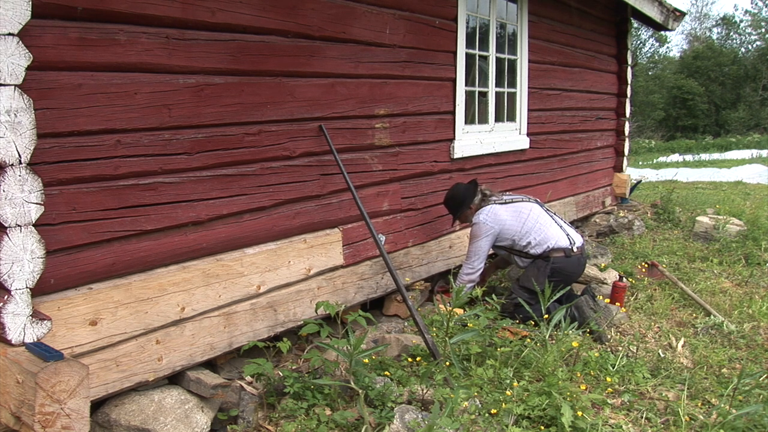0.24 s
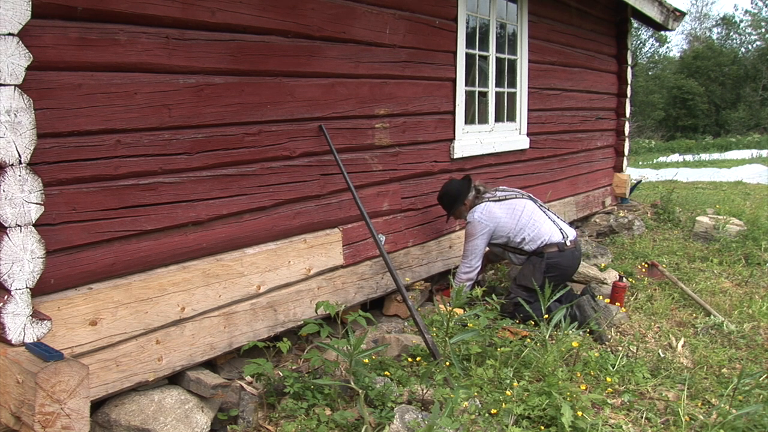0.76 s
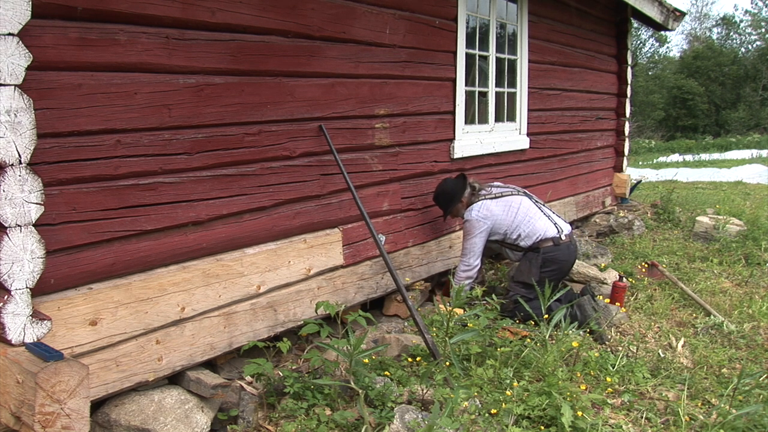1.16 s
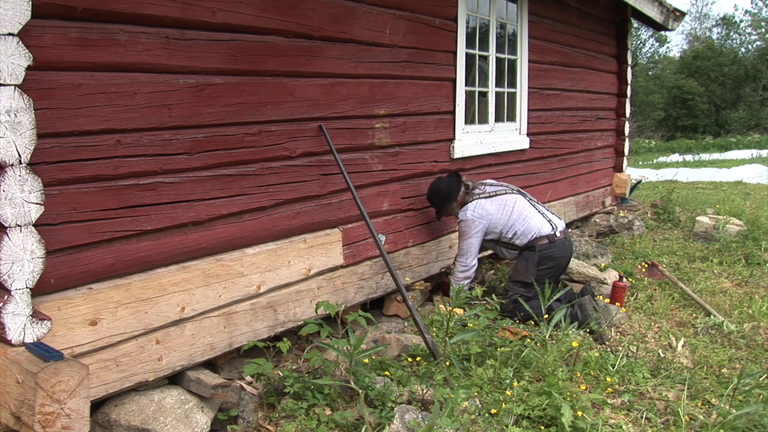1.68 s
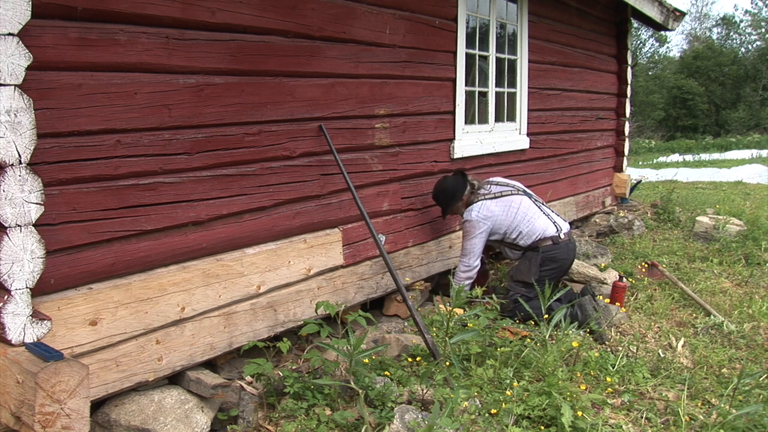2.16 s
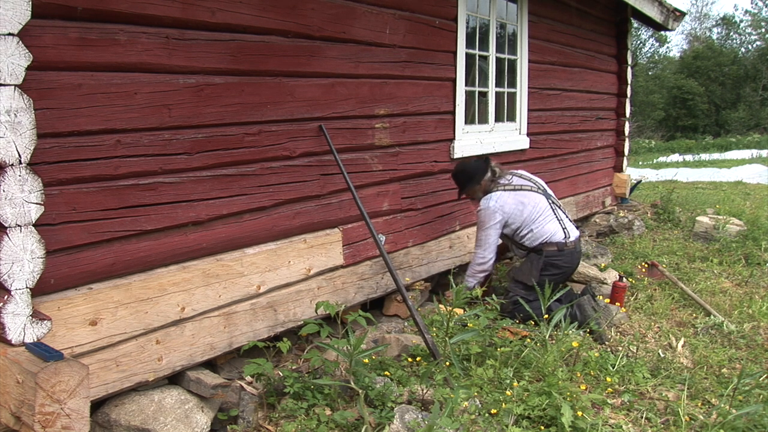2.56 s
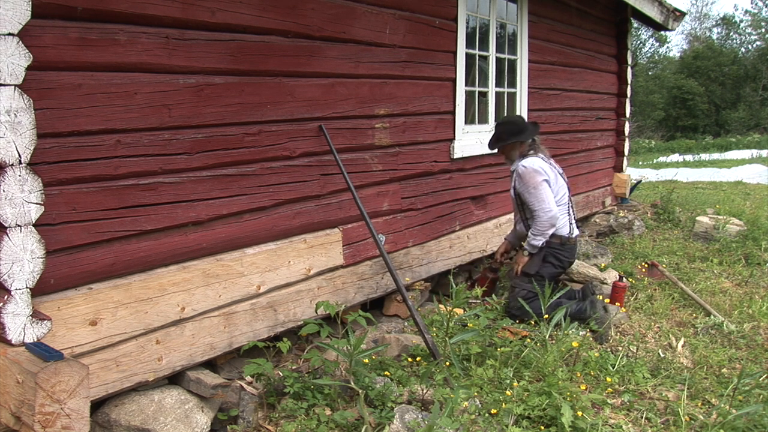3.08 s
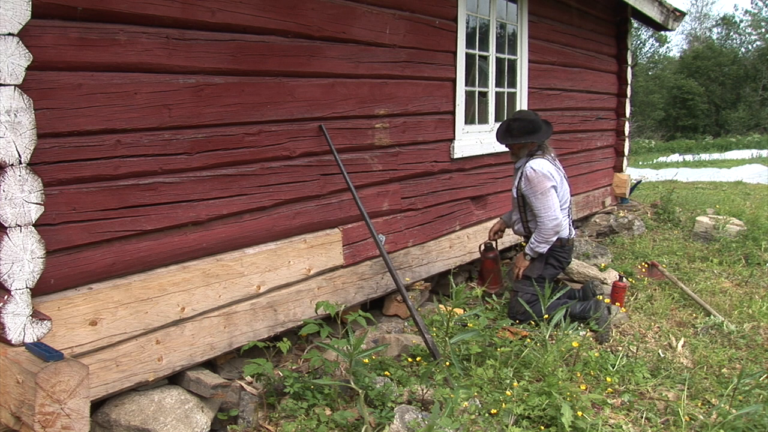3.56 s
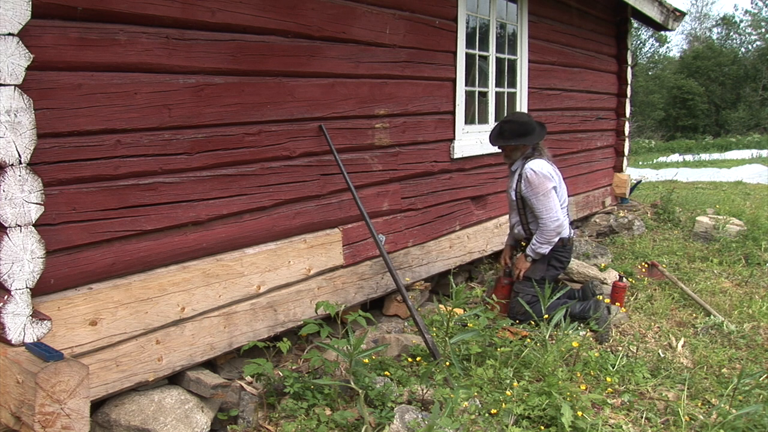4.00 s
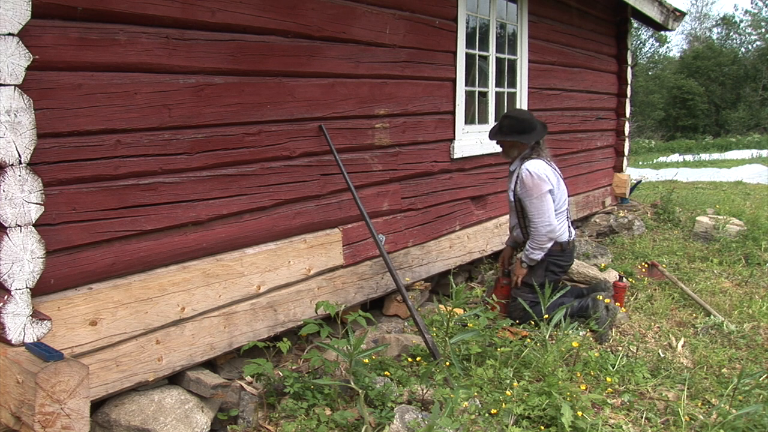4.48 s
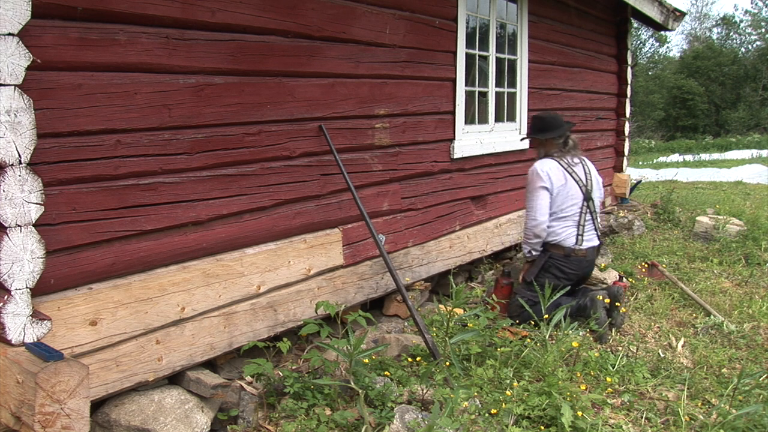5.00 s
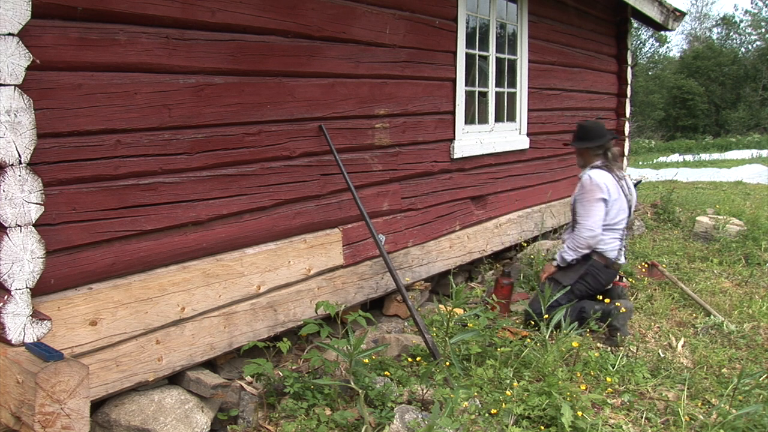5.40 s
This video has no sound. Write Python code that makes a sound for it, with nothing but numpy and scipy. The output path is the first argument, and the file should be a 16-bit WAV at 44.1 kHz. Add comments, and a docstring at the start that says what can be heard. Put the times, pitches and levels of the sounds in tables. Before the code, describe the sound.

Beside a log wall, a kneeling worker shifts stones and a steel jack. Three short clusters of metallic clinks with gritty stone clacks come over low wooden bumps, separated by quieter ticks and thuds. The jack is then set down on soft ground with a muted thump and two small ticks. Cloth and grass rustle gently over a steady, quiet air bed. Stereo microphones, little reverberation.

```python
"""Beside a log house, someone kneels and shifts loose stones and a steel jack under the sill.
The steel clinks on the stones in three flurries: decaying, beating modes over gritty, resonant stone clacks.
Filtered noise bursts tick like small stones; low decaying modes bump and thump on timber and ground.
Clothes and grass rustle as swelling noise, over a steady noise bed of open air and far trees."""
import sys
import numpy as np
from scipy import signal
from scipy.io import wavfile

SR = 44100
rng = np.random.default_rng(int(sys.argv[2]) if len(sys.argv) > 2 else 0)


def persist_wave(psi):
    """Save psi, clipped to +-1, as 16-bit WAV."""
    counts = np.round(np.clip(psi, -1, 1) * 32767).astype(np.int16)
    wavfile.write(sys.argv[1], SR, np.atleast_2d(counts).T)


N = 249165  # length in samples

# The steel's main modes, named for their sound [Hz]
HUM, CLANK, CLINK, RING, CHINK, TANG, TING, ZING, PING, SHIMMER = 1212, 2382, 2856, 3198, 3628, 3818, 4460, 5250, 5920, 11380
# The main modes of the sill, and of the struck stones [Hz]
BOOM, THUD, TOCK, CLACK = 110.6, 221.4, 751, 1742

# Steel on stone: (time [s], relative clack level [dB], contact length [s], relative ring level [dB],
#   ring length [share of the free ring], brightness [dB per octave],
#   modes the struck spot favours or mutes [(frequency [Hz], change [dB])])
KNOCKS = [(0.0272, -22, 0.031, -28.5, 1.9, 3, [(5400, 13.7), (TANG, 14.5), (CLACK, 9.1)]),
          (0.0345, -27, 0.013, -27.5, 1.24, -3, [(CLANK, 5.8), (CLINK, 1), (RING, 3.1), (CLACK, 12),
          (PING, 4.2)]), (0.086, -37.5, 0.092, -36.5, 0.78, 2, [(CLANK, 9.2), (3440, 19), (PING, 1.7)]),
          (0.211, -38.5, 0.07, -45, 0.76, -2, [(3400, 17), (5124, 4.6), (CLANK, -6)]),
          (0.2653, -25.5, 0.047, -35.5, .57, 5.5, [(TING, 20), (RING, 4.7)]),
          (0.275, -36.5, 0.068, -38, 0.47, 5, [(TING, 28.4)]),
          (0.3398, -23, 0.031, -32.5, .35, 1, [(CLANK, 5.2), (4300, 7.6), (TING, 14), (ZING, -8)]),
          (0.364, -36, 0.065, -41, 0.83, 0, [(CLANK, 1), (RING, 2.2)]),
          (2.0313, -39.5, 0.047, -40, 0.37, -4.5, [(CLANK, -8), (CLINK, 6.5), (ZING, 11), (PING, -11),
          (SHIMMER, 13)]), (2.065, -34, 0.033, -42, 0.6, 5.5, [(CLANK, 16), (CHINK, 5.5), (TANG, 12.4),
          (ZING, 2.7)]), (2.122, -29, 0.013, -35.5, .98, -4.5, [(CLANK, 6.2), (CLINK, -3)]),
          (2.137, -53, .02, -38.5, 0.71, 0.5, [(CLANK, 11), (CLINK, 6.7), (CHINK, -12), (PING, 6.3)]),
          (2.1729, -34, 0.017, -39, .32, 7.5, [(PING, 13), (RING, 4.3), (CLANK, -10), (SHIMMER, 7.1)]),
          (2.1848, -28, 0.017, -46.5, 0.68, 8, [(RING, 15), (PING, 20), (CLINK, 3.6), (HUM, 22.7)]),
          (2.238, -35, 0.06, -49, 0.43, 10, [(PING, 11), (ZING, -12), (CHINK, 6.7)]),
          (2.2814, -31.5, 0.016, -36, 0.77, 2.5, [(ZING, 8.7), (PING, 12), (CHINK, -21), (SHIMMER, 10),
          (12730, 15)]), (3.281, -24.5, 0.015, -37, 0.41, -1.5, [(CLANK, 8.4), (CHINK, 2.7), (TANG, 7.9),
          (4629, 11), (6500, 11), (11400, 14.7)]), (3.351, -39, 0.027, -38.5, 0.13, -4, [(RING, 11),
          (CHINK, 6), (TANG, 12)]), (3.364, -52, .02, -44, .3, -2.5, [(TANG, 20), (CHINK, 8.2),
          (PING, 12.4)]), (3.4345, -26, 0.024, -41, 0.87, 0, [(CLINK, 7), (RING, 6.3), (ZING, 3.5),
          (SHIMMER, 13)]), (3.446, -50, .012, -48, 1.5, -7, [(CLINK, 20.6), (RING, 6.5), (ZING, 6.1),
          (SHIMMER, 14)]), (3.462, -63, 0.022, -52.5, 0.44, 2, [(CLINK, 19.3), (ZING, 7.1), (SHIMMER, 15)]),
          (3.496, -62, 0.042, -54.5, 1.6, -13, [(RING, 11), (CLANK, 5.3)]),
          (3.613, -73, 0.069, -54, 1, -17, [(CLANK, 9.7)]),
          (3.66, -58, 0.057, -53.5, 1.2, 0.5, [(ZING, 9.6), (PING, 7.9), (HUM, 14), (CHINK, -19)])]
# Modes of the steel: (frequency [Hz], relative level [dB], free t60 [s])
STEEL_MODES = [(HUM, -11, .24), (CLANK, 1.5, .17), (CLINK, 4.8, .2), (RING, -.4, .4), (CHINK, -1, .1),
               (TANG, -9.5, .39), (3950, -10, .1), (TING, -23, .14), (4629, -23, .3), (5124, -14, .14),
               (ZING, -4, .19), (PING, -7.5, .39), (6075, -23, .3), (6390, -18, .14), (7260, -23, .22),
               (8120, -17, .24), (9162, -21, .42), (10200, -31, .15), (SHIMMER, -31, .24),
               (12730, -34, .24)]
# How the ring reaches two microphones: (frequency [Hz], left minus right [dB], left lead [rad])
EARS = [(1200, -4, .4), (2300, 0, .08), (3900, .3, 0), (4457, 8, -.4), (5200, -4, -.3), (5950, 5, -2.7),
        (8100, -3, -3.1), (9200, -2, -2.1), (11400, 3, 0), (12700, -1, .9)]
# Colour of the steel's faint overtones: (frequency [Hz], relative level [dB])
OVERTONE_COLOUR = [(3300, -3), (4800, 0), (6400, 1), (7400, -29), (8600, -2), (12000, -17), (15000, -9)]
# Resonances of the struck stones: (frequency [Hz], width [Hz], relative level [dB])
STONE_MODES = [(1084, 72, 0.5), (CLACK, 60, 7), (1880, 80, 2), (1983, 60, 5), (2170, 110, -7),
               (2710, 49, 0.5), (2870, 54, 5), (3168, 120, 0.77), (3410, 115, -0.53), (3526, 29, -2.3),
               (3970, 150, -10), (4466, 50, -27.5), (5070, 98, -7.5), (5200, 260, -9), (5600, 127, -20.5),
               (7640, 300, -43), (11300, 2100, -43.5)]
# Small stones ticking: (time [s], relative level [dB], brightness [dB per octave])
TICKS = [(0.151, -26.5, -2.5), (0.9916, -29.5, -1), (1.4023, -53, 7), (1.908, -35, -3.5),
         (2.2372, -20, -2.5), (2.633, -33, -6.5), (3.249, -38.5, -4), (3.4325, -29, -5.5), (4.06, -40, 1.5),
         (4.081, -35.5, -1), (4.272, -43.5, -3.5)]
# Colour of a tick: (low edge [Hz], high edge [Hz], relative level [dB])
TICK_BANDS = [(1670, 3250, -4), (3320, 5070, -7), (9000, 14000, -17.5)]
# Reflections off the log wall and the ground: (delay [s], level against the direct sound [dB])
ECHOES = [(.0031, -14), (.0074, -24.5), (0.013, -17)]
# Stones bumping on earth and timber: (time [s], relative level [dB], hardness [dB per octave],
#   modes the spot favours or mutes [(frequency [Hz], change [dB])])
BUMPS = [(0.002, -37.5, -6.5, []), (0.034, -37, -3.5, []), (0.103, -42.5, -3, [(THUD, 7.7)]),
         (0.151, -31, 0, [(TOCK, 9.2)]), (0.158, -42, -3, [(TOCK, 16), (BOOM, 8.5)]),
         (0.208, -39, -5.5, []), (0.305, -38, 0, []), (0.802, -46.5, 6, []), (1.077, -48, -3, []),
         (1.124, -39.5, -2.5, [(THUD, 7)]), (1.333, -43, -7.5, [(THUD, 4.2)]), (1.36, -45.5, -1, []),
         (1.392, -45.5, -3, []), (1.67, -45, 0, [(THUD, 4.3)]), (1.781, -46, -8, []),
         (1.906, -43, 1, [(BOOM, 8.3), (TOCK, 4)]), (1.961, -44, -4.5, []), (2.054, -43, 4, [(622, 7)]),
         (2.074, -40.5, -1, [(THUD, 3.5)]), (2.2375, -36, 4.5, [(492, 10.6), (TOCK, 0)]),
         (2.575, -46.5, 3.5, []), (2.616, -54, -2, [(BOOM, 13)])]
# Modes of the sill and the ground: (frequency [Hz], relative level [dB], t60 [s])
SILL_MODES = [(83, 2.4, 0.38), (BOOM, 4.3, 0.36), (152, -12, 0.64), (176.3, -6, 0.33), (THUD, 1.34, 0.074),
              (294, -1.1, 0.055), (396, -3, 0.059), (492, -7, 0.046), (622, 2.5, 0.05), (TOCK, 2.8, 0.07),
              (966, 11, 0.042)]
# Stereo place of the sill's modes: (frequency [Hz], left minus right [dB])
SILL_PAN = [(110, 5), (700, -14.5)]
# Rustle with each move of the body: (time of its height [s], level [dB], time constant of its fall [s])
MOVES = [(0.02, -49, 0.1), (2.051, -57.5, 1), (3.25, -53, 0.21), (4.082, -57, 0.1), (4.47, -58, 0.21),
         (5.33, -54.5, 0.15)]
# Colour of the rustle: (frequency [Hz], relative density [dB per Hz])
RUSTLE_COLOUR = [(200, -9), (500, 4.5), (850, 4), (2700, -1), (4500, -7.5), (8000, -27.5), (12000, -19.5),
                 (16000, -25)]
# Colour of the air and far trees: (frequency [Hz], relative density [dB per Hz])
AIR_COLOUR = [(25, -20.5), (45, -13.5), (70, -5), (100, 0.5), (150, -6), (210, -14), (330, -21.5),
              (550, -26.5), (1100, -12.5), (1800, -17.5), (2800, -19.5), (4000, -53.5), (7000, -47),
              (15700, -48)]
# Stereo likeness of the noise beds: (frequency [Hz], left-right likeness [0 to 1])
LIKENESS = [(100, 0.89), (400, 0.36), (1000, 0.29), (2400, 0.98), (6000, 0.011)]

STEEL_PIVOT_HZ, SPOT_OCTAVES = 2830, 0.06  # brightness turns about this pitch; reach of a spot's accent
DETUNE = 0.0009  # random pitch shift of a steel mode, as a share
OVERTONE_T60_S = 0.12  # before the ring length scales it
# Longer contacts than this bring out the stone's low resonances
CONTACT_S, BODY_DB_PER_DOUBLING, BODY_BELOW_HZ = 0.045, 4.5, 2200
BUMP_CENTRE_HZ, BUMP_ARCH_DB = 270, 6  # centre of a bump's colour; its loss one octave to either side
SET_DOWN_S, SET_DOWN_DB = 4.064, -39  # the jack meets the soft ground
MOVE_RISE_S, RESTING_DB = 0.093, -61.5  # time constant of a move's swell; rustle between moves
AIR_DB = -53
CUTOFF_HZ = 15700


def steel(ring_db=3.5, snap=0.51, snap_s=0.00035, build_s=0.015, choke_s=0.0052,
          spread_db=0.35, twin_db=-11, beat_hz=26, settle_s=0.66):
    """Each contact chokes the last ring and starts new decaying modes, whose length and pitch vary."""
    out, t = np.zeros((2, N)), np.arange(SR // 2) / SR
    next_times = [row[0] for row in KNOCKS[1:]] + [N / SR]
    ear_hz, ear_db, ear_lead = np.transpose(EARS)
    sides = np.array([[.5], [-.5]])
    for (s, _, _, strength_db, length, bright_db, accents), next_s in zip(KNOCKS, next_times):
        # part of the ring comes almost at once, the rest builds up while the contact chatters
        attack = 1 - snap * np.exp(-t / snap_s) - (1 - snap) * np.exp(-t / build_s)
        choke = np.exp(-np.maximum(t - (next_s - s), 0) / choke_s)
        # as the steel settles onto its support, the ring dies ever faster
        gate = attack * choke * np.exp(-(t / settle_s) ** 4)
        for hz, mode_db, t60 in STEEL_MODES:
            colour_db = bright_db * np.log2(hz / STEEL_PIVOT_HZ) + accent(hz, accents)
            # the higher the mode, the more its share is left to chance
            chance_db = spread_db * np.sqrt(hz / STEEL_PIVOT_HZ) * rng.normal()
            level_db = ring_db + strength_db + mode_db + colour_db + chance_db
            fade = from_db(level_db - 60 * t / (t60 * length))
            mode_hz = hz * (1 + DETUNE * rng.normal())
            tone = np.exp(2j * np.pi * (mode_hz * t + rng.random()))
            # the round body splits each mode into a close pair that beats
            split_hz = beat_hz * rng.uniform(0.65, 2.26)
            twin = 1 + from_db(twin_db) * np.exp(2j * np.pi * (split_hz * t + rng.random()))
            ear_gain = from_db(np.interp(hz, ear_hz, ear_db) * sides)
            ear_phase = np.exp(1j * np.interp(hz, ear_hz, ear_lead) * sides)
            add(out, s, (ear_gain * ear_phase * (gate * fade * tone * twin)).real)
    return out


def splash(splash_db=-25, low_hz=3300, high_hz=15000, scatter=0.047, spread_db=4, count=36):
    """Each knock stirs a crowd of faint, short overtones, different from knock to knock and ear to ear."""
    out, t = np.zeros((2, N)), np.arange(SR // 5) / SR
    for s, _, _, strength_db, length, bright_db, _ in KNOCKS:
        hz = np.geomspace(low_hz, high_hz, count)[:, None]
        hz = hz * (1 + scatter * rng.uniform(-1.15, 1, (count, 1)))
        colour_db = at_hz(OVERTONE_COLOUR, hz) + bright_db * np.log2(hz / STEEL_PIVOT_HZ)
        level_db = splash_db + strength_db + colour_db + spread_db * rng.normal(size=(count, 1))
        # a random phase for each overtone at each ear
        ears = np.exp(2j * np.pi * rng.random((2, count))) * from_db(level_db).T
        swing = 2 * np.pi * hz * t
        crowd = ears.real @ np.sin(swing) + ears.imag @ np.cos(swing)
        add(out, s, crowd * from_db(-60 * t / (OVERTONE_T60_S * np.sqrt(length))))
    return out


def clacks(clack_db=15, grind_db=-15, grind_lasts=6, grit_db=2.5, rise_share=0.12,
           stone_shift=0.01, crack_db=-4, crack_t60=0.0035):
    """A gritty crack and a short grind excite the stone's brief resonances, shifted at each knock."""
    out, t = np.zeros((2, N)), np.arange(SR // 3) / SR
    for s, level_db, contact_s, *_, accents in KNOCKS:
        age = t / contact_s
        press = from_db(-60 * age) + from_db(grind_db - 60 * age / grind_lasts)
        force = (1 - np.exp(-age / rise_share)) * press
        force = force + from_db(crack_db - 60 * t / crack_t60)
        # slow noise, a new point every 70 samples, roughens the force
        grit = np.interp(np.arange(len(t)) / 70, np.arange(len(t)), rng.standard_normal(len(t)))
        gritty_gain = from_db(clack_db + level_db + grit_db * np.minimum(grit, 1))
        contact = gritty_gain * force * stereo_noise(len(t), alike=0.97)
        body_db = BODY_DB_PER_DOUBLING * np.log2(contact_s / CONTACT_S)
        for k, (hz, width, db) in enumerate(STONE_MODES):
            # neighbouring modes swing in opposite senses
            gain = (-1) ** k * from_db(db + accent(hz, accents) + body_db * (hz < BODY_BELOW_HZ))
            add(out, s, gain * resonate(contact, hz * (1 + stone_shift * rng.normal()), width))
    return out


def ticks(tick_db=-10, tick_t60=0.055, alike=0.85, ring_hz=3620, ring_width_hz=110, ring_db=6):
    """Small stones give a short crack of banded noise with one brief resonance."""
    out, t = np.zeros((2, N)), np.arange(SR // 6) / SR
    for s, strength_db, bright_db in TICKS:
        for low, high, band_db in TICK_BANDS:
            tilt_db = bright_db * np.log2(low / TICK_BANDS[0][0])
            burst = stereo_noise(len(t), alike) * from_db(-60 * t / tick_t60)
            # make up for the power lost outside the band
            crack = band(burst, low, high) * np.sqrt(SR / 2 / (high - low))
            crack = crack + from_db(ring_db) * resonate(crack, ring_hz, ring_width_hz)
            add(out, s, crack * from_db(tick_db + strength_db + band_db + tilt_db))
    return out


def wall(x):
    """Close reflections, delayed and weaker copies, thicken every crack."""
    out = x.copy()
    for delay_s, db in ECHOES:
        add(out, delay_s, from_db(db) * x)
    return out


def bumps(rise_s=0.0028, detune=0.019, scuff_db=-8, scuff_t60=0.36, scuff_low_hz=90, scuff_high_hz=280):
    """A heavy stone lands softly, rings the sill a little differently each time, and scuffs as it settles."""
    out, t = np.zeros((2, N)), np.arange(SR // 2) / SR
    rise, sides = 1 - np.exp(-t / rise_s), np.array([[.5], [-.5]])
    for s, strength_db, hard_db, accents in BUMPS:
        for hz, mode_db, t60 in SILL_MODES:
            colour_db = bump_colour(hz, hard_db) + accent(hz, accents)
            level_db = strength_db + mode_db + colour_db + at_hz(SILL_PAN, hz) * sides
            mode_hz = hz * (1 + detune * rng.normal())
            tone = np.sin(2 * np.pi * (mode_hz * t + rng.random()))
            add(out, s, rise * from_db(level_db - 60 * t / t60) * tone)
        scuff = rms_one(band(rng.standard_normal(len(t)), scuff_low_hz, scuff_high_hz))
        level_db = scuff_db + strength_db + bump_colour(np.sqrt(scuff_low_hz * scuff_high_hz), hard_db)
        add(out, s, rise * scuff * from_db(level_db - 60 * t / scuff_t60))
    return out


def set_down(deep_hz=45, thud_hz=105, thud_db=4, deep_t60=0.15, thud_t60=0.14, rise_s=0.003):
    """Soft ground takes the jack's weight with a deep, dead thump of two fast-fading tones."""
    out, t = np.zeros((2, N)), np.arange(SR // 2) / SR
    deep = from_db(-60 * t / deep_t60) * np.sin(2 * np.pi * deep_hz * t)
    thud = from_db(thud_db - 60 * t / thud_t60) * np.sin(2 * np.pi * thud_hz * t)
    add(out, SET_DOWN_S, from_db(SET_DOWN_DB) * (1 - np.exp(-t / rise_s)) * (deep + thud))
    return out


def rustle(crinkle_db=1.5, crinkles_per_s=120):
    """Clothes and grass rub with each move: coloured noise with an uneven, crinkling level."""
    t = np.arange(N) / SR
    crinkle = np.interp(t * crinkles_per_s, np.arange(N), rng.standard_normal(N))
    return movement(t) * from_db(crinkle_db * crinkle) * coloured_noise(RUSTLE_COLOUR)


def air():
    """Open air and far trees blend into a steady coloured noise."""
    return from_db(AIR_DB) * coloured_noise(AIR_COLOUR)


def movement(t):
    """Strength of the rustle: each move swells and dies away over a faint resting stir."""
    power = from_db(RESTING_DB) ** 2
    for s, level_db, fall_s in MOVES:
        swell = np.exp(-np.maximum((s - t) / MOVE_RISE_S, (t - s) / fall_s))
        power = power + (from_db(level_db) * swell) ** 2
    return np.sqrt(power)


def accent(hz, accents):
    """Level in dB that the struck spot adds to a mode or takes from it."""
    return sum(db * np.exp(-(np.log2(hz / spot_hz) / SPOT_OCTAVES) ** 2) for spot_hz, db in accents)


def bump_colour(hz, hard_db):
    """Colour of a bump in dB: soft landings lean to the bass, hard ones to the upper modes."""
    octaves = np.log2(hz / BUMP_CENTRE_HZ)
    return hard_db * octaves - BUMP_ARCH_DB * octaves ** 2


def resonate(x, hz, width_hz):
    """Two-pole resonance with a gain of about 1 at its peak."""
    r = np.exp(-np.pi * width_hz / SR)
    feedback = [1, -2 * r * np.cos(2 * np.pi * hz / SR), r * r]
    return signal.lfilter((1 - r * r) / 2 * np.array([1, 0, -1]), feedback, x)


def coloured_noise(spectrum):
    """Sum of 24 bands of noise, each with its own level and left-right likeness; overall rms 1."""
    edges = np.geomspace(spectrum[0][0], CUTOFF_HZ, 25)
    out = 0
    for low, high in zip(edges, edges[1:]):
        hz = np.sqrt(low * high)
        noise = stereo_noise(N, at_hz(LIKENESS, hz))
        out = out + from_db(at_hz(spectrum, hz)) * band(noise, low, high)
    return rms_one(out)


def stereo_noise(size, alike):
    """White noise in two channels whose correlation is alike."""
    mid, side = rng.standard_normal((2, size))
    return (np.sqrt(1 + alike) * mid + np.sqrt(1 - alike) * side * [[1], [-1]]) / np.sqrt(2)


def band(x, low_hz, high_hz):
    """Band-pass filter."""
    return signal.sosfilt(signal.butter(2, [low_hz, high_hz], "band", fs=SR, output="sos"), x)


def at_hz(points, hz):
    """Read a table's second column on a log-frequency axis."""
    points = np.array(points)
    return np.interp(np.log(hz), np.log(points[:, 0]), points[:, 1])


def from_db(db):
    """Amplitude of a level in dB."""
    return 10 ** (np.asarray(db) / 20)


def rms_one(x):
    """Scale a sound to rms 1."""
    return x / np.sqrt(np.mean(x ** 2) + 1e-20)


def add(out, s, sound):
    """Mix a sound in from time s, in seconds."""
    start = round(s * SR)
    out[:, start:start + sound.shape[-1]] += sound[..., :N - start]


def scene():
    """Steel, stones, timber and ground over the rustle and the open air."""
    stones = wall(clacks() + ticks())
    return steel() + splash() + stones + bumps() + set_down() + rustle() + air()


def record(dry):
    """A steep low-pass filter cuts the top."""
    return signal.sosfilt(signal.ellip(10, .1, 80, CUTOFF_HZ, fs=SR, output="sos"), dry)


dry = scene()
out = record(dry)
persist_wave(out)
```